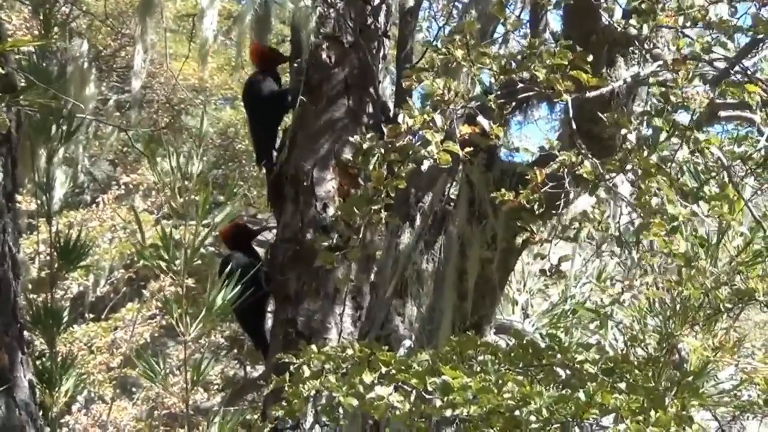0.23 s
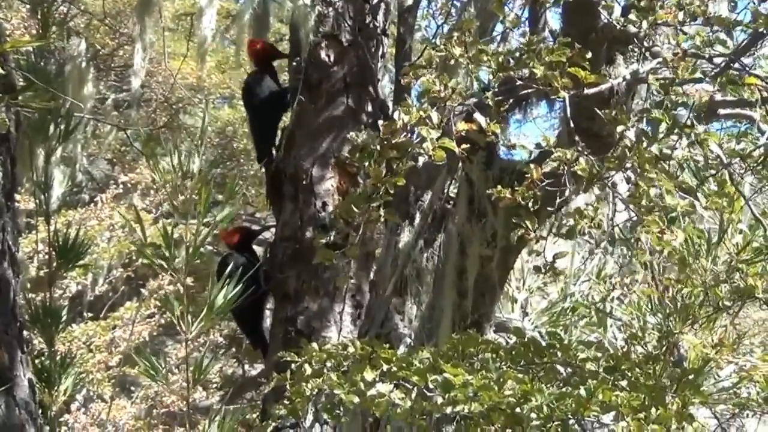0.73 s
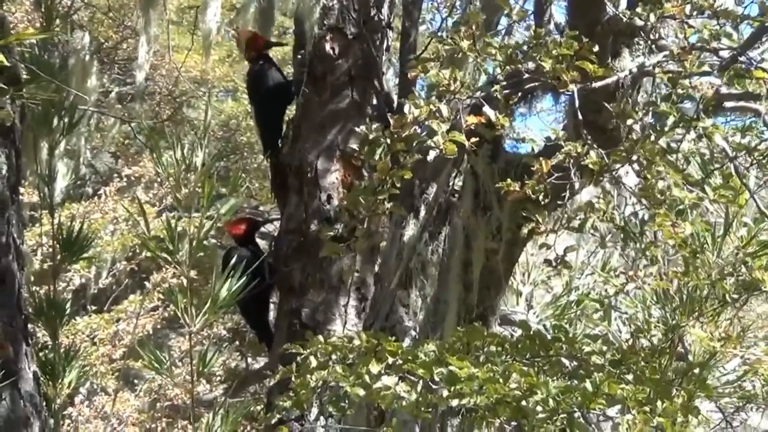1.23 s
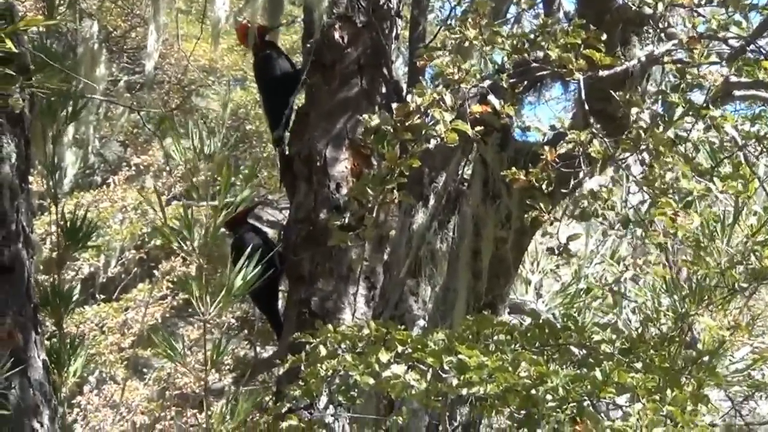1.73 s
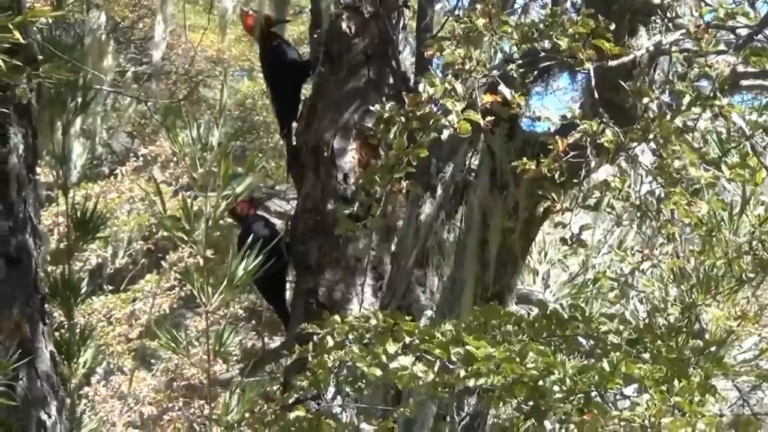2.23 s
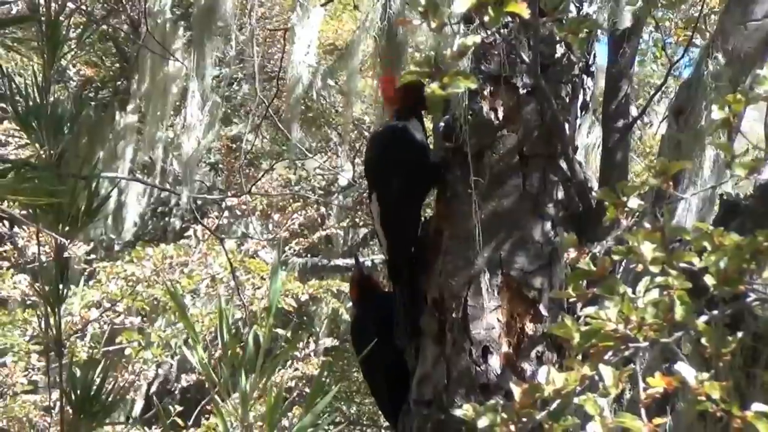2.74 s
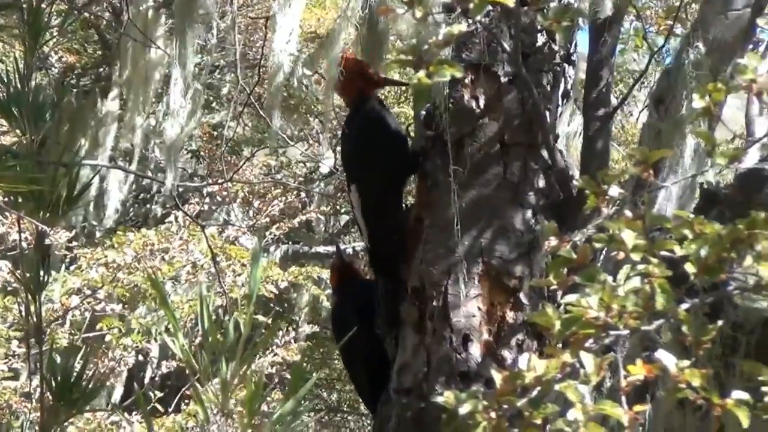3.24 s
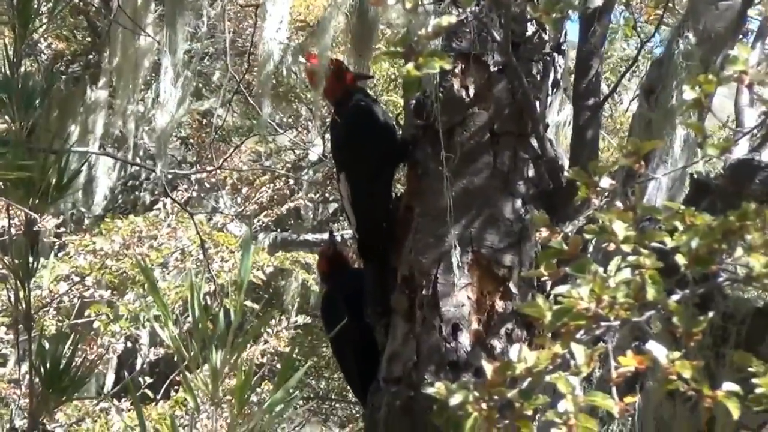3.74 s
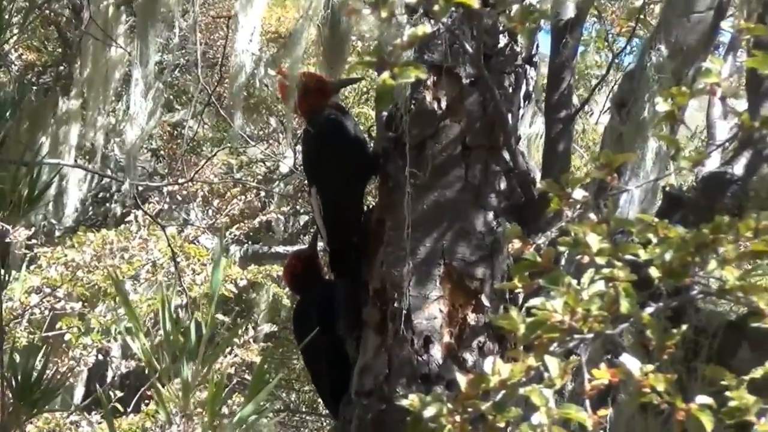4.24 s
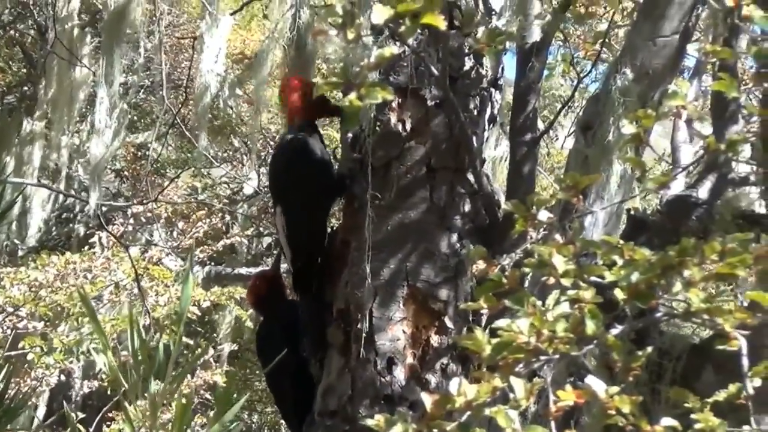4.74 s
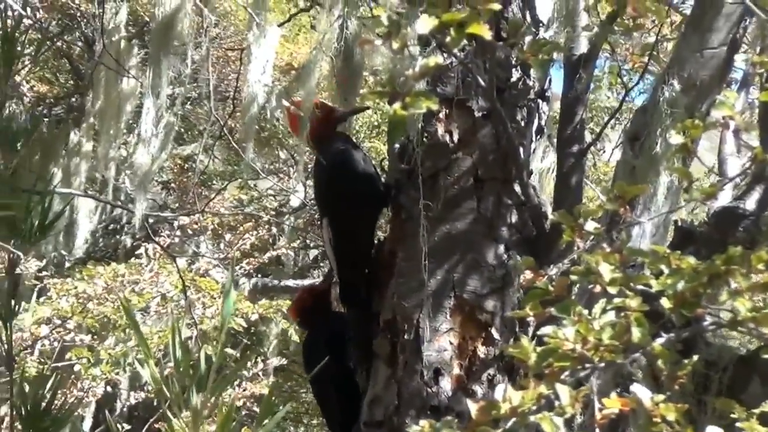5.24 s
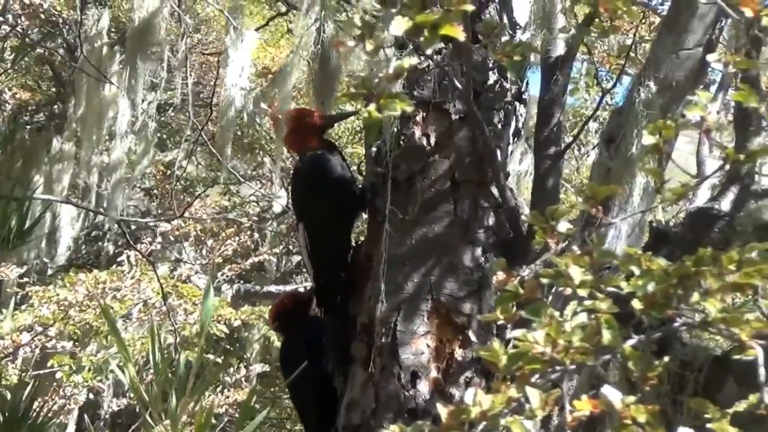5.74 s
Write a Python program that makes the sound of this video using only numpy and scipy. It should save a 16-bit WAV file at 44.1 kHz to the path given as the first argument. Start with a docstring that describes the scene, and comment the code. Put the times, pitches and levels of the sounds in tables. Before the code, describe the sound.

Outdoors in woodland, a microphone some way off catches quiet nasal murmurs and light woody pecks over a faint rush of air. A whine rises, a brief silence cuts in, and brisk nasal chatter follows, swelling into sharp arched cries that break into squeals. After a short rest come a long harsh yell, two falling cries and one faint note and tap between them. Short, diffuse echoes from bark and trees.

```python
"""Nasal calls of two large woodpeckers on a forest trunk: soft mewing notes with a few bill taps, then runs of
loud cries that arch in pitch and rise to a squeal. Each note is a train of syrinx pulses, built from harmonics
and shaped by a moving throat resonance and the bill. The forest is filtered noise: a far rush and a faint hiss.
Echoes from bark, leaves and trees are decaying noise convolved with the birds. Taps are a noise crack with
ringing trunk modes."""
import sys
import numpy as np
from scipy import signal
from scipy.fft import rfft, irfft, next_fast_len
from scipy.io import wavfile
from scipy.ndimage import uniform_filter1d, map_coordinates

SR = 44100
rng = np.random.default_rng(int(sys.argv[2]) if len(sys.argv) > 2 else 0)


def file_out(sig):
    """Save sig as 16-bit WAV at sys.argv[1]."""
    # one column per channel
    cols = np.atleast_2d(sig).T
    # limit, then scale
    lim = np.clip(cols, -1, 1)
    pcm = np.round(lim * 32767).astype(np.int16)
    wavfile.write(sys.argv[1], SR, pcm)


N = 263717

# Short arched notes, levels and brightness before the register and the swell:
# start_s, length_s, rise_s, crest_pitch_hz, end_pitch_hz, level_db, release_s, throat_hz, bright_db, bill_set
SHORT_NOTES = [ (-0.06, 0.075, 0.038, 545, 389, -58.5, 0.016, 2820, 2, "mew"),
               (0.137, 0.091, 0.041, 586, 414, -57.5, 0.012, 2760, -11.5, "mew"),
               (0.294, 0.098, 0.042, 596, 397, -57.5, 0.021, 2740, -9, "mew"),
               (0.48, 0.091, 0.042, 597.5, 434, -56, 0.013, 2170, -19, "murmur"),
               (0.665, 0.09, 0.035, 569, 398, -59, 0.02, 2080, -16, "murmur"),
               (2.338, 0.084, 0.027, 514.7, 432, -55.5, 0.015, 2920, -6.5, "open"),
               (2.495, 0.049, 0.015, 488, 450, -68, 0.020, 2880, -3, "open"),
               (2.557, 0.13, 0.039, 644.5, 419, -51, 0.012, 3410, 4.5, "open"),
               (2.771, 0.11, 0.038, 569, 422.5, -52.5, 0.0096, 3300, 4, "chatter"),
               (2.976, 0.087, 0.038, 500.5, 388, -55, 0.0057, 3110, 1.5, "chatter"),
               (3.152, 0.083, 0.038, 489, 388, -55.5, 0.0097, 3030, 0.5, "chatter"),
               (3.322, 0.097, 0.033, 531.4, 397, -54.5, 0.019, 3090, 3, "chatter"),
               (3.498, 0.11, 0.048, 539, 382, -55, 0.019, 3120, 1.5, "chatter"),
               (4.374, 0.065, 0.024, 465.6, 374, -58, 0.012, 3000, -1.5, "sigh"),
               (5.680, 0.070, 0.024, 471, 392, -59, 0.0069, 2990, 1.5, "sigh")]
# Long cries, likewise before the register and the swell: first_bright_db, last_bright_db, bill_set,
# course of (time_s, pitch_hz, level_db, throat_hz)
LONG_CRIES = [ (-14.5, -2, "whine", [(1.736, 430, -60, 2630), (1.772, 699.5, -59.5, 3020),
              (1.806, 750.5, -54, 3180), (1.836, 623, -52.5, 2840), (1.884, 796.6, -53, 2970),
              (1.93, 780, -55.5, 3570), (1.962, 728.4, -52, 3240), (1.99, 591, -52.5, 2900),
              (2.045, 480.4, -55.5, 3070)]), (-4.5, -2.5, "open", [(2.094, 514, -59, 3100),
              (2.12, 665, -51, 3170), (2.16, 604, -51, 2960), (2.182, 530, -53, 3250),
              (2.226, 521, -54, 3100), (2.258, 448, -61, 3000)]),
              (0.5, 4.5, "open", [(3.686, 471, -54.5, 3150), (3.708, 568, -54, 3120),
              (3.742, 801, -52.5, 3430), (3.754, 844, -47, 3500), (3.772, 817, -50, 3300),
              (3.791, 703, -50, 3370), (3.798, 578, -49.5, 3300), (3.829, 511, -52.5, 3380)]),
              (4, 2.5, "open", [(3.882, 810, -43.5, 3140), (3.893, 892, -40.5, 3400),
              (3.909, 1040, -49, 4750), (3.935, 1043, -56, 5000), (3.949, 980, -48.5, 4840),
              (3.975, 926, -45, 3500), (3.991, 823, -47, 3340), (4.026, 694, -49.5, 3350),
              (4.032, 606, -52, 3420), (4.051, 537, -47.5, 3380)]),
              (3, 4.5, "shout", [(4.110, 800, -47, 3300), (4.121, 955, -39, 3870), (4.13, 997, -48, 4500),
              (4.148, 984, -44.5, 4590), (4.172, 944, -49.5, 4500), (4.186, 889, -49, 3370),
              (4.214, 733, -50, 3200), (4.225, 562, -51, 3280), (4.243, 548, -53.5, 3400),
              (4.257, 463, -51, 3400)]), (5.5, 5, "yell", [(5.027, 540, -52, 3200), (5.04, 604, -52, 3100),
              (5.052, 878, -47.5, 3240), (5.08, 960, -47.5, 3820), (5.112, 867.7, -47.5, 3360),
              (5.172, 855, -48.5, 3470), (5.184, 765, -51, 3160), (5.213, 734, -51, 3200),
              (5.219, 604, -50, 3270), (5.234, 660, -53, 3250), (5.247, 588, -51.5, 3410),
              (5.268, 616, -51.5, 3380), (5.291, 569, -52.5, 3390), (5.312, 580, -53.5, 3440),
              (5.348, 504, -57.5, 3460)]), (6.5, 2, "shout", [(5.414, 538, -56, 3330),
              (5.424, 562, -51, 3550), (5.446, 766, -53, 3470), (5.458, 778, -53.5, 3630),
              (5.48, 716, -52.5, 3430), (5.49, 604, -54.5, 3460), (5.516, 529.6, -54, 3200),
              (5.545, 429.4, -57, 3200), (5.57, 414, -57.5, 3120)]),
              (1, 6, "open", [(5.849, 418, -53, 3150), (5.866, 548, -54.5, 3120), (5.884, 634, -55, 3300),
              (5.9, 648, -54, 3450), (5.913, 631, -52.5, 3250), (5.922, 558, -51.5, 3350),
              (5.934, 552, -52.5, 3310), (5.955, 429, -55.5, 3230), (5.97, 430, -57, 3220)])]
# How the voice changes with its pitch: pitch_hz, level_db, bright_db
REGISTER_CURVE = [(395, -3, -2.5), (453.5, -1, -9), (563, 1, 2.5), (646, -0.5, 3.5), (774, -0.5, 8.5),
                  (930, 0, 0.5), (978, -6, 10)]
# Change of the pulse at the highest pitches: harmonic_number, gain_db
SQUEAL_COLOUR = [(1.0, -2), (2.0, -14), (3.0, -8.5), (4.0, -13), (5.0, -0.5), (6.0, 5), (7.0, 0.5),
                 (8.0, -7.5), (9.0, -6), (10.0, 14.5), (11.0, 7.5), (13.0, 5.5)]
# Colour that moves with the throat: multiple_of_throat_resonance, gain_db
THROAT_COLOUR = [(0.45, 5), (0.7, 6.5), (0.87, 4.5), (1.0, 11.5), (1.12, -2.5), (1.32, -5.5), (1.55, -13.5),
                 (1.85, -13), (2.2, -18), (2.55, -20), (3.0, -20.5), (3.6, -22.5)]
# Fixed colour of the bill and the path through the air: frequency_hz, gain_db
BILL_COLOUR = [(400.0, -17), (650.0, -8), (1000.0, -10), (1500.0, -4), (2100.0, -11), (3000.0, -1),
               (4400.0, 10), (6200.0, 3), (9400.0, 10), (10800.0, 3), (13000.0, -1), (15500.0, -14)]
# Sets of the bill, by name: peak_hz, peak_db, hollow_hz, hollow_db, top_treble_db
BILL_SETS = {"murmur": (5300, 19.5, 2900, -6, 13), "mew": (5900, 9, 4900, -3.5, -1),
             "whine": (5003, 5, 6600, -5, -6.5), "sigh": (10701, 12.5, 6100, -8, 6),
             "chatter": (3807, 3.5, 6496.5, -5, 10), "open": (8999, 2, 2506, -1, 2),
             "shout": (4400, 2.5, 2500, -1.5, -7), "yell": (3396, 3, 4797, -4.5, -10)}
# Spectrum of the far rush of air, relative: frequency_hz, density_db_per_hz
AIR_SPECTRUM = [(18, -68), (30, -51), (111, -17), (310, -10.5), (412, -5), (506, -10), (746, 2.5),
                (994, -9), (1250, -3), (1410, -10.5), (1630, -11), (1840, -11.5), (2450, -12.5),
                (4000, -17.5), (5200, -37), (8800, -120)]
# Course of the far rush before its flutter: time_s, level_db
AIR_COURSE = [(0, -64.5), (0.9, -66.5), (1.7, -67.5), (2.5, -64.5), (3.4, -63.5), (4.5, -64), (4.95, -66.5),
              (5.5, -65), (5.98, -65)]
# Spectrum of the steady hiss, relative: frequency_hz, density_db_per_hz
HISS_SPECTRUM = [(2000, -28), (4500, 3.5), (8000, 0), (13000, 0), (15700, -10)]
# Likeness of the forest on left and right: frequency_hz, correlation
STEREO_LIKENESS = [(60, .9), (250, 0.98), (800, 0.96), (4000, 0.62), (12000, 1)]
# Decay of the farther trees: frequency_hz, t60_s
TREE_DECAY = [(300, 0.9), (3000, 0.34), (6000, 0.31), (12000, 0.054)]
# Colour of the whole echo: frequency_hz, gain_db
ECHO_TINT = [(300, 4), (1500, 4.5), (3200, 2), (5000, 5.5), (8000, 11), (12000, -19)]
# Bill on the trunk: time_s, level_db, hollow_thud_db, woody_ring_db, crack_db
BILL_TAPS = [(0.071, -44, -22, 1, -2), (0.080, -50, -12, 0, -6), (0.339, -45, -22, 3, -5),
             (0.550, -45, -22, 1, -2), (0.810, -42, -15, -11, 0), (0.820, -49, -9, -5, -1),
             (1.051, -47, -7, -7, 0), (1.060, -50, -6, -5, -2), (1.334, -60, 8, -13, -1),
             (1.463, -60, 4, -10, -2), (1.583, -62, 4, -10, -2), (5.652, -49, -30, -30, 0)]
# Modes of the trunk, lowest first, levels before a small random change: frequency_hz, level_db, t60_s
TRUNK_MODES = [(405, 3, 0.058), (546, -15, 0.028), (857, 2, 0.053), (1080, -33, 0.032), (1310, -4, 0.029),
               (1670, -13, 0.025)]
# Colour of the crack on the bark, relative: frequency_hz, gain_db
CRACK_COLOUR = [(100, -46), (300, -19), (700, 7.5), (1800, 0), (3000, -7), (5000, -21), (9000, -19.5),
                (15000, -19)]
# Place of the birds in stereo: frequency_hz, left_minus_right_db
LEFT_TILT = [(500, -1.2), (2500, 0.56), (5000, 1.6), (10000, 0.4), (14000, -1.1)]
# Brief silence: start_s, end_s
SILENCE = (2.460, 2.494)

TOP_HZ, LOW_CUT_HZ = 15750, 50  # limits of the band

# Shape of a note
START_RATIO = 0.74  # an arched note starts at this share of its crest pitch
ATTACK_S, ATTACK_DB = 0.031, 6.5  # every note swells in over this time, from this far down
RELEASE_DB, CRY_RELEASE_S = 8.5, 0.011  # how far a note dies away before it stops; how fast a cry does
DULL_PER_DB = 0.86  # brightness lost for each dB that the swell is below full strength
THROAT_FOLLOWS = 0.16  # power of the pitch by which an arched note's throat resonance sinks from its crest
CATCH_S, CATCH_RATIO, CATCH_DB = 0.011, 1.13, 1  # closing catch: a small flick up in pitch and level
SAG_DB_PER_OCTAVE = 3.5  # strength an arched note loses as its pitch sinks from the crest
WEAK_BELOW_HZ, WEAK_DB_PER_OCTAVE = 550, 6  # the fundamental fades below this pitch

# Hoarseness, as noise to tone ratios before the joint limit
STRAIN_RASP, CRACK_RASP = .09, .16  # a forced note below its squeal; where the voice cracks
EDGE_RASP, EDGE_RASP_S = 0.21, 0.022  # as the voice starts and stops, and how long it lasts
TREBLE_RASP, TREBLE_RASP_HZ = 0.31, 6000  # extra for low, lax pulses, and the middle of its onset
BREAK_PER_S, BREAK_DB, BREAK_RASP = 10.4, 2.5, 0.27  # fall (log ratio per s) that breaks; loss; hoarseness
FLICKER_DB = 1.7  # flicker of a partial an octave of frequency (twice) above the throat resonance


def amp(db):
    """Decibels to gain."""
    return 10 ** (np.asarray(db) / 20)


def unit(x):
    """Scale to rms 1."""
    return x / np.sqrt(np.mean(np.abs(x) ** 2) + 1e-20)


def along(points, hz):
    """Read (frequency, value) points on a log frequency axis."""
    f, v = np.transpose(points)
    return np.interp(np.log(hz + 1), np.log(f + 1), v)


def wobble(knots):
    """A smooth random curve, read at positions counted in knots."""
    return map_coordinates(rng.standard_normal(int(knots[-1]) + 4), [knots])


def filtered(x, response):
    """Shape the spectrum of x by a response of frequency."""
    n = x.shape[-1]
    m = next_fast_len(n + 8192)
    return irfft(rfft(x, m) * response(np.fft.rfftfreq(m, 1 / SR)), m)[..., :n]


def causal(points, hz, size=2048):
    """Complex response at hz of a passive body: the minimum phase that goes with its colour."""
    grid = np.fft.rfftfreq(size, 1 / SR)
    cepstrum = irfft(np.log(amp(along(points, grid))))
    fold = np.r_[1, np.full(size // 2 - 1, 2), 1, np.zeros(size // 2 - 1)]
    return np.exp(np.interp(hz, grid, rfft(cepstrum * fold)))


def add(track, s, sound):
    """Mix a sound into a track at time s."""
    part = track[max(round(s * SR), 0):][:len(sound)]
    part += sound[:len(part)]


def calls():
    """The short notes and long cries of the two birds."""
    track = np.zeros(N)
    for start, length, rise, crest_hz, end_hz, db, release, throat_hz, bright_db, bill in SHORT_NOTES:
        t, pitch, catch = arch(start, length, rise, crest_hz, end_hz)
        throat = throat_hz * (pitch / crest_hz) ** THROAT_FOLLOWS
        level_db = db + SAG_DB_PER_OCTAVE * np.log2(pitch / crest_hz) + CATCH_DB * catch
        voice_curves = controls(t, pitch, level_db, release, throat, bright_db)
        sound = note(t, *voice_curves, BILL_SETS[bill])
        add(track, start, sound[t >= 0])  # a note may already be sounding at the start
    for first_db, last_db, bill, course in LONG_CRIES:
        s, *columns = np.transpose(course)
        t = np.arange(s[0], s[-1], 1 / SR)
        pitch, db, throat = [np.interp(t, s, c) for c in columns]
        bright_db = np.linspace(first_db, last_db, len(t))
        voice_curves = controls(t, pitch, db, CRY_RELEASE_S, throat, bright_db)
        add(track, s[0], note(t, *voice_curves, BILL_SETS[bill]))
    return track


def arch(start, length, rise, crest_hz, end_hz):
    """Times, pitch and closing catch of a short note: a quick rise, then a slower fall that levels out."""
    age = np.arange(0, length, 1 / SR)
    up = crest_hz * (START_RATIO + (1 - START_RATIO) * np.sin(np.pi / 2 * age / rise))
    fall = np.cos(np.pi / 2 * (age - rise) / (length - rise)) ** 2
    down = end_hz + (crest_hz - end_hz) * fall
    catch = np.clip(1 - (length - age) / CATCH_S, 0, 1)
    return start + age, np.where(age < rise, up, down) * CATCH_RATIO ** catch, catch


def controls(t, pitch, db, release, throat_hz, bright_db):
    """Smooth pitch, level, throat and brightness: level and brightness follow pitch, attack and release."""
    steps, *columns = np.transpose(REGISTER_CURVE)
    gain_db, harden_db = [np.interp(pitch, steps, c) for c in columns]
    attack_db = -ATTACK_DB * np.clip(1 - (t - t[0]) / ATTACK_S, 0, 1)
    release_db = -RELEASE_DB * np.clip(1 - (t[-1] - t) / release, 0, 1)
    effort_db = attack_db + release_db
    level_db = db + gain_db + effort_db
    brightness_db = bright_db + harden_db + DULL_PER_DB * effort_db
    return [uniform_filter1d(c, size=150) for c in (pitch, level_db, throat_hz, brightness_db)]


def note(t, pitch, db, throat_hz, bright_db, gape, jitter=0.0038, shimmer_db=0.57, rasp=0.055,
         slide_rasp=0.0037, onset_rasp=0.75, onset_s=0.02, treble_rasp=0.092, purity=0.84,
         smear=0.00091, edge_s=0.00294):
    """One nasal note: the harmonics of the syrinx pulses, shaped by throat and bill."""
    cycles = np.cumsum(pitch) / SR
    phase = 2 * np.pi * np.cumsum(pitch * (1 + jitter * wobble(cycles))) / SR
    k = np.arange(1, int(TOP_HZ / pitch.min()) + 1)[:, None]  # harmonic numbers
    hz = k * pitch

    # harder pulses carry more treble; at the top of its range the voice thins to a squeal
    squeal = np.clip((pitch - 780) / 220, 0, 1)
    colour_db = bright_db * np.clip(np.log2(hz / 2200) / 1.73, 0, 1)
    colour_db = colour_db + squeal * np.interp(k, *np.transpose(SQUEAL_COLOUR))
    colour_db = colour_db + WEAK_DB_PER_OCTAVE * np.minimum(np.log2(hz / WEAK_BELOW_HZ), 0)

    # the peaks and hollows of the throat slide together as it widens and narrows
    middle = throat_hz.mean()
    throat = causal(np.multiply(THROAT_COLOUR, [middle, 1]), hz * middle / throat_hz)
    # low pulses are crisp; as the pitch rises their treble trails and blunts them
    bluntness = smear * np.clip(pitch / 450 - 1, 0, 1)
    trail = np.exp(-1j * np.pi * bluntness * hz ** 2 / throat_hz)
    colour = amp(colour_db + gape_db(hz, gape))
    voice = causal(BILL_COLOUR, hz) * throat * trail * colour * (hz < TOP_HZ)

    # pulses are irregular while the pitch slides, and as a high, forced note breaks in
    forced = squeal.max()
    slide = uniform_filter1d(np.abs(np.gradient(np.log(pitch))) * SR, size=400)
    steady_rasp = (rasp + slide_rasp * slide) * (1 - purity * squeal)
    breaking = onset_rasp * forced * np.exp(-((t - t[0]) / onset_s) ** 2)
    # a forced note cracks as it passes in and out of the squeal, and stays hoarse below it
    strain = STRAIN_RASP * forced * (1 - squeal) ** 2
    strain = strain + CRACK_RASP * (forced ** 2 * np.sin(np.pi * squeal)) ** 2
    # it falters at both ends, and wherever it drops abruptly to a lower register
    fall_per_s = -np.gradient(np.log(pitch)) * SR
    drop = uniform_filter1d(np.clip(fall_per_s / BREAK_PER_S - 1, 0, 1), size=300)
    to_edge = np.minimum(t - t[0], t[-1] - t)
    faltering = EDGE_RASP * np.exp(-to_edge / EDGE_RASP_S) + BREAK_RASP * drop
    # all of it grows towards the treble
    rough = (steady_rasp + breaking + strain + faltering) * (1 + treble_rasp * k)
    lax_treble = np.clip(2 * np.log2(hz / TREBLE_RASP_HZ) + 1, 0, 2)
    rough = np.clip(rough, 0, 2) + TREBLE_RASP * (1 - forced) * lax_treble

    # neighbouring harmonics share part of their scatter
    scatter = np.array([wobble(cycles) + 1j * wobble(cycles) for _ in k])
    scatter = unit(uniform_filter1d(scatter, size=3, axis=0))
    pulses = (1 + rough * scatter) / np.sqrt(1 + rough ** 2) * np.exp(1j * k * phase)
    # the upper partials flicker in strength, each on its own
    flicker = np.array([wobble(cycles / 20) for _ in k])
    pulses = pulses * amp(FLICKER_DB * np.clip(hz / throat_hz - 1, 0, 1.5) * flicker)

    level = amp(db - BREAK_DB * drop + shimmer_db * wobble(cycles / 2))
    fade = np.clip(to_edge / edge_s, 0, 1)
    return np.sqrt(2) * (voice * pulses).real.sum(0) * level * fade


def gape_db(hz, gape, width_octaves=0.15, top_hz=9500, top_octaves=0.36):
    """The opening of the bill sets one upper peak, one hollow and how much top treble escapes."""
    peak_hz, peak_db, hollow_hz, hollow_db, top_db = gape
    bump = lambda centre: np.exp(-(np.log2(hz / centre) / width_octaves) ** 2)
    treble = np.clip(np.log2(hz / top_hz) / top_octaves, 0, 1)
    return peak_db * bump(peak_hz) + hollow_db * bump(hollow_hz) + top_db * treble


def forest(hiss_db=-74, flutter_db=2.5):
    """A far rush of air in the trees swells slowly and flutters over a steady faint hiss."""
    t = np.arange(N) / SR
    air_db = np.interp(t, *np.transpose(AIR_COURSE)) + flutter_db * wobble(8 * t)
    return rush(AIR_SPECTRUM) * amp(air_db) + rush(HISS_SPECTRUM) * amp(hiss_db)


def rush(spectrum):
    """Stereo noise of rms 1; mid and side are balanced to give the likeness of left and right."""
    def response(hz):
        turn = np.arccos(np.clip(along(STEREO_LIKENESS, hz), -1, 1)) / 2
        return amp(along(spectrum, hz)) * [np.cos(turn), np.sin(turn)]

    mid, side = filtered(rng.standard_normal((2, N)), response)
    return unit(np.array([mid + side, mid - side]))


def echo(x, near_db=-10, near_t60=0.024, far_db=-23, spread=0.22):
    """Nearby bark and leaves answer at once; the farther trees add a thin tail that decays by frequency."""
    hz, t, z = signal.stft(rng.standard_normal((2, SR // 2)), SR, nperseg=256)
    decay = amp(-60 * t / along(TREE_DECAY, hz)[:, None])
    far = signal.istft(z * decay, SR, nperseg=256)[1]
    # cubed noise is sparse, like single reflections
    near = rng.standard_normal(far.shape) ** 3 * amp(-60 * np.arange(far.shape[1]) / SR / near_t60)
    tail = amp(near_db) * near / np.linalg.norm(near[0]) + amp(far_db) * far / np.linalg.norm(far[0])
    delayed = np.pad(x, (SR // 500, 0))  # 2 ms
    wet = signal.fftconvolve(delayed[None], tail, axes=1)[:, :N]
    mid, side = filtered(wet, lambda hz: amp(along(ECHO_TINT, hz)))
    return np.array([mid + spread * side, mid - spread * side])


def taps(crack_t60=0.03, attack_s=0.00019, radiate_hz=260):
    """Each peck cracks on the bark and rings the trunk; the lowest mode is its hollow thud."""
    track, t = np.zeros(N), np.arange(SR // 5) / SR
    for s, db, thud_db, ring_db, crack_db in BILL_TAPS:
        modes = [amp(level + rng.normal(0, 1) - 60 * t / t60) * np.sin(2 * np.pi * hz * t)
                 for hz, level, t60 in TRUNK_MODES]
        crack = unit(filtered(rng.standard_normal(len(t)), lambda hz: amp(along(CRACK_COLOUR, hz))))
        crack = crack * amp(-60 * t / crack_t60)
        blow = amp(thud_db) * modes[0] + amp(ring_db) * sum(modes[1:]) + amp(crack_db) * crack
        add(track, s, amp(db) * blow * (1 - np.exp(-t / attack_s)))
    # the trunk radiates little below its lowest mode
    return signal.sosfilt(signal.butter(2, radiate_hz, 'high', fs=SR, output='sos'), track)


def scene(calls_db=0, taps_db=0):
    """The birds and their echo, tilted between left and right by frequency, over the forest."""
    birds = amp(calls_db) * calls() + amp(taps_db) * taps()
    placed = filtered(birds + echo(birds), lambda hz: amp(np.outer([.5, -.5], along(LEFT_TILT, hz))))
    return placed + forest()


def record(dry):
    """The microphone sheds deep bass, the sound drops out for a moment, and the band ends at its limit."""
    t = np.arange(N) / SR
    thin = filtered(dry, lambda hz: hz / np.hypot(hz, LOW_CUT_HZ))
    live = uniform_filter1d(1.0 * ((t < SILENCE[0]) | (t > SILENCE[1])), size=64)
    return filtered(thin * live, lambda hz: hz < TOP_HZ)


dry = scene()
out = record(dry)
file_out(out)
```